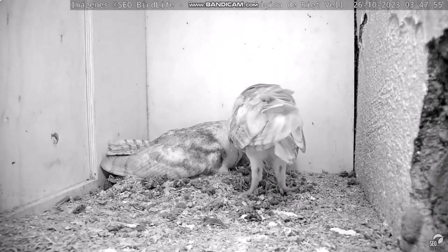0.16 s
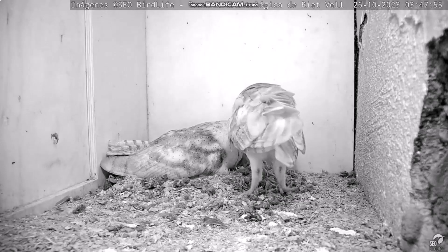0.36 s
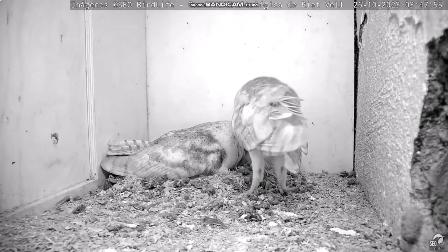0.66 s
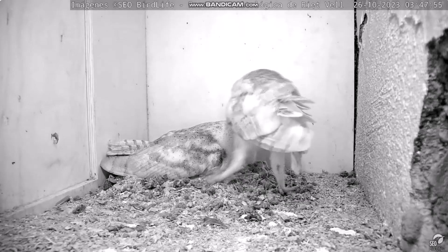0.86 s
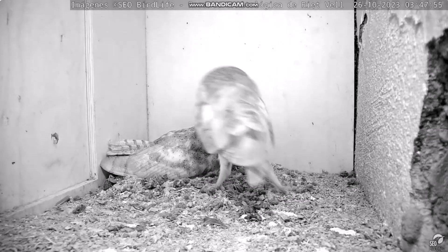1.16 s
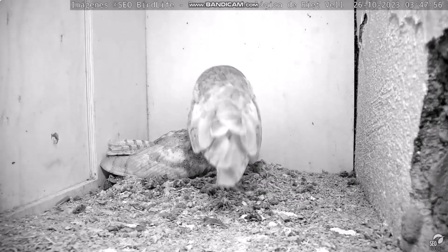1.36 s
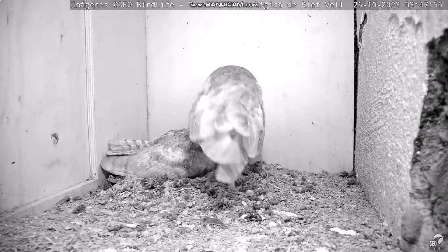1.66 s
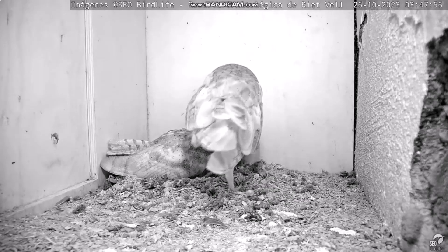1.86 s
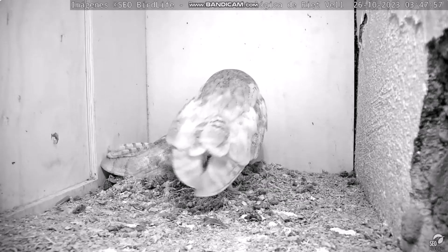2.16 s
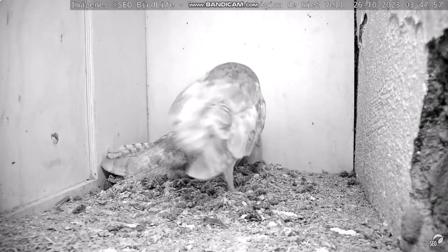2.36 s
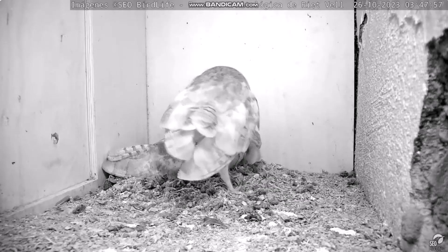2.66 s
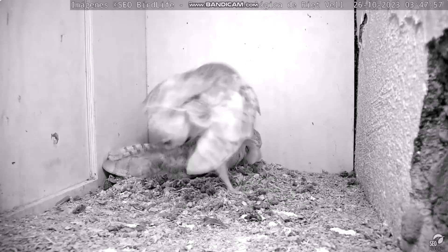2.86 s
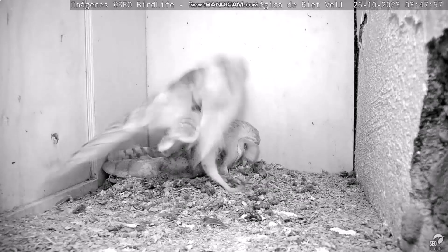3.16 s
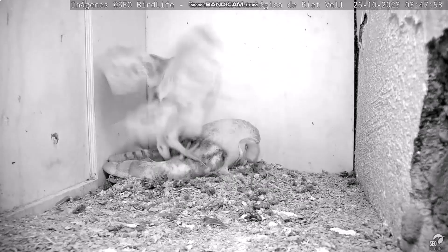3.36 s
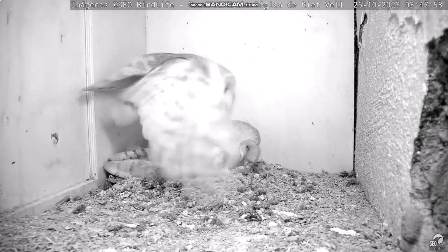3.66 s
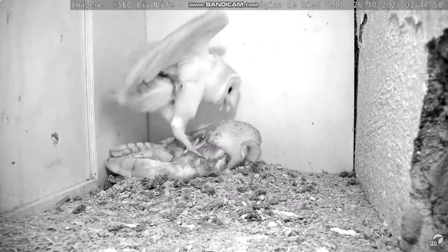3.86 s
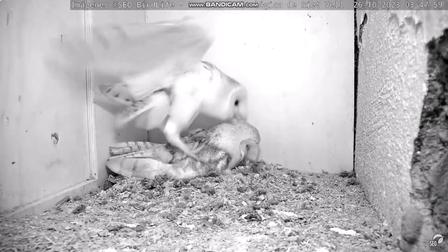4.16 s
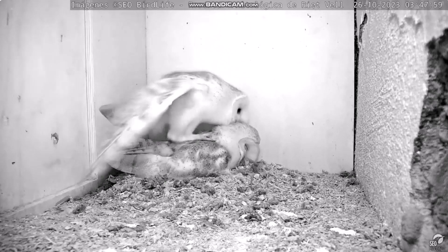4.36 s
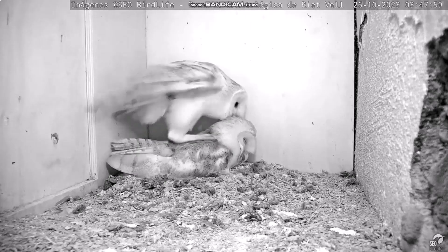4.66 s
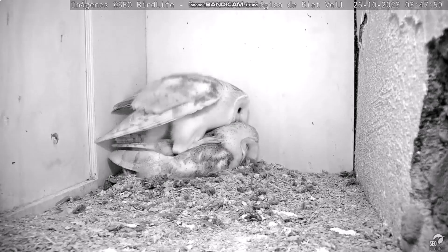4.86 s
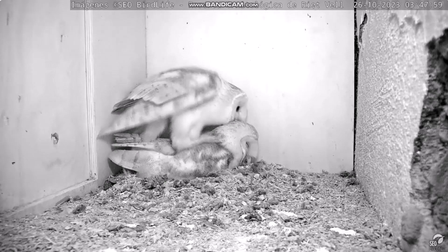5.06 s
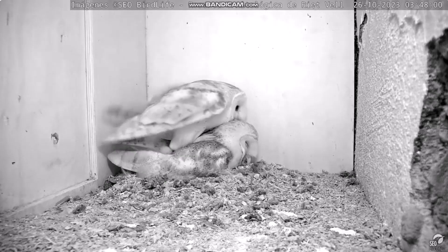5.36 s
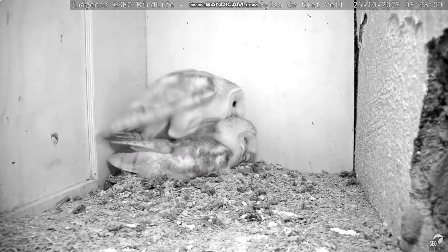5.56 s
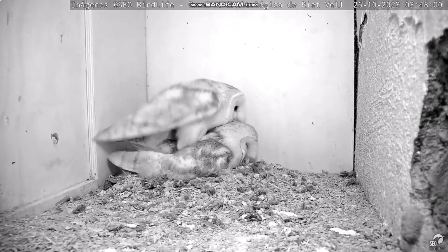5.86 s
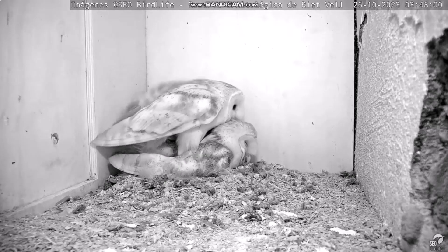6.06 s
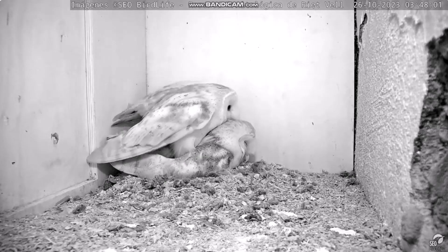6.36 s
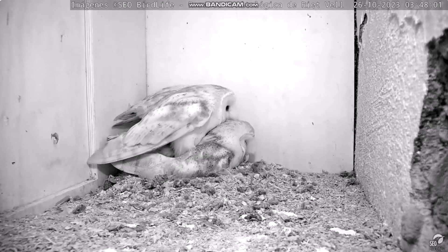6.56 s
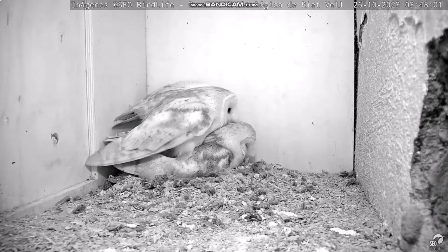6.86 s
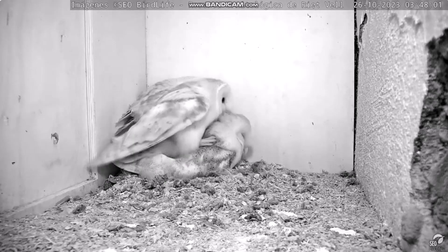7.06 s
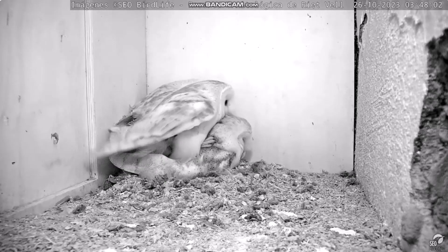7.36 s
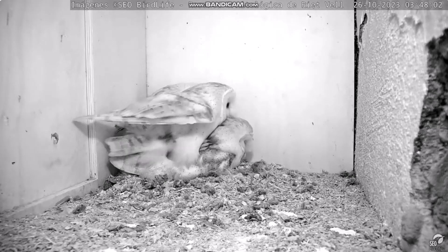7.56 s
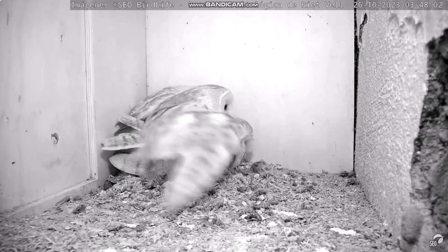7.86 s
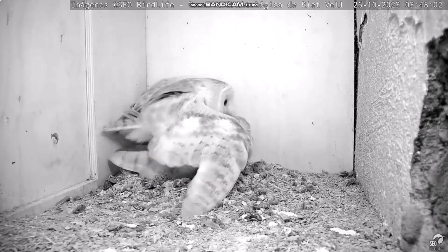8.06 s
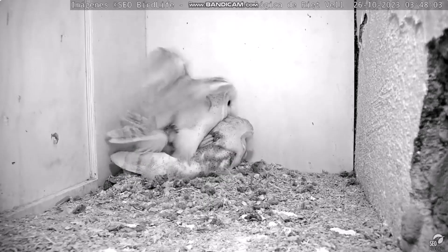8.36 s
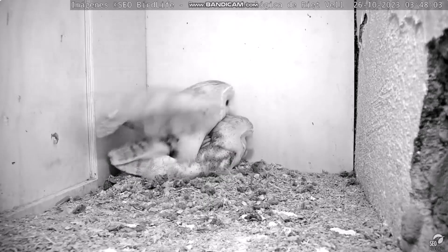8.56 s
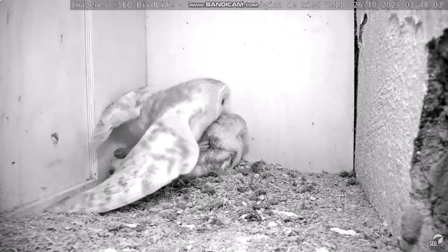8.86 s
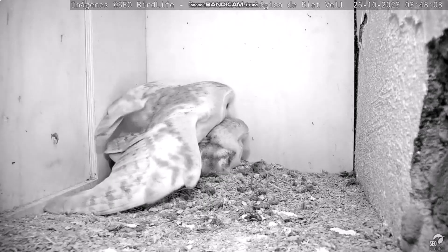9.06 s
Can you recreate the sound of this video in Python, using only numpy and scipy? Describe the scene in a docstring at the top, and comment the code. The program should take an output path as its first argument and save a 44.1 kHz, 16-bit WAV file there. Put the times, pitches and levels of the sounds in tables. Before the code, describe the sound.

A barn owl gives long, trilled, rasping screeches inside a wooden box while a second owl adds short chirps.

```python
"""Two barn owls in a nest box

At night one owl gives long, trilled screeches: its voice swings evenly in a clear whistle, then turns chaotic
and breaks into a rasp. The other answers with short, clear chirps. The wooden box rings with their calls, wing
beats shake a wall, and there is one soft knock. A small camera microphone hears them over its own hiss; there
is one sharp click, and its stream drops out twice."""
import sys
import numpy as np
from scipy import signal
from scipy.fft import rfft, irfft, next_fast_len
from scipy.io import wavfile
from scipy.ndimage import uniform_filter1d

SR = 44100
rng = np.random.default_rng(int(sys.argv[2]) if len(sys.argv) > 2 else 0)


def int16_out(signal):
    """Quantize to a 16-bit WAV file."""
    q = np.round(np.clip(np.atleast_2d(signal).T, -1, 1) * 32767)
    wavfile.write(sys.argv[1], SR, q.astype(np.int16))


N = 405719
TIME = np.arange(N) / SR
PANEL_HZ = 178   # the low note of a wooden wall


def whistle(beats):
    """The voice swings evenly; each trill beat scoops its pitch up and makes its level throb."""
    # start/s, length/s, from/Hz, to/Hz, growth/dB, throb/dB, partials 1 to 4/dB
    notes = [(-.01, 0.13, 1644, 1643, 1.5, 2.5, -34.5, -52, -66, -63.5),
             (0.1, 0.28, 1640, 1653, 1, 5.5, -33, -55.5, -71, -74),
             (0.36, 0.51, 1685, 1701, -5.5, 2.5, -31.5, -62, -69, -68),
             (2.188, 0.079, 1520, 1568, -4, 3, -38.5, -53, -64, -61),
             (2.278, 0.3, 1574, 1570, 1, 7.5, -39.5, -52.5, -64.5, -64.5),
             (4.003, 0.024, 1738, 1776, 4.5, 1, -37, -39, -60, -69),
             (4.283, 0.049, 1981, 1973, 1, 6, -50, -45, -72, -86),
             (4.33, 0.059, 2068, 2138, 10, -2, -53, -49.5, -63, -58),
             (4.39, 0.029, 2014, 1954, 1, -3, -59, -43.5, -60, -53),
             (4.416, 0.0631, 1624, 1700, -6.5, 3.5, -38.5, -37, -62, -62),
             (4.482, .067, 1570, 1620, -2, -2, -41, -46.5, -60, -89.5),
             (5.629, 0.028, 1813, 1823, 0, 6, -35.5, -21.5, -36.5, -59),
             (5.65, 0.0277, 1715, 1614, -18, 4, -34, -28, -66.5, -77),
             (6, 0.05, 1505, 1585, -6.5, 1.5, -36, -34.5, -59, -71),
             (6.053, 0.33, 1599, 1601, 4, 2.5, -43.5, -44.5, -59.5, -80),
             (6.998, 0.051, 1930, 2000, -3, 2.5, -40.5, -53.5, -74, -105),
             (7.36, 1.12, 1543, 1563, -4.5, 6, -49, -70.5, -79, -91.5),
             (8.524, 0.03, 1977, 2040, 1, -3.5, -40.5, -38, -55.5, -92),
             (8.886, 0.047, 1624, 1568, -3, 5.5, -38, -29.5, -51, -78),
             (8.926, 0.09, 1507, 1690, 4.5, 0.5, -45.5, -41, -55, -71)]
    # hoarseness: t/s, pitch waver/Hz, overtone flicker/dB
    hoarseness = [(0, 18, 4.5), (.9, 35, 6), (2.1, 15, 3.5), (2.6, 22, 4.5), (4.2, 55, 5), (4.4, 55, 5),
                  (4.43, 40, 4), (4.5, 20, 3), (5.9, 10, 2), (7.1, 15, 2), (7.36, 75, 2), (8.45, 75, 2),
                  (8.52, 20, 2), (9.2, 20, 2)]
    rise_s, fall_s, sag_hz = .0089, .0177, 40.85
    spans = []
    for start, length, from_hz, to_hz, growth_db, depth_db, *levels_db in notes:
        shares = [0, rise_s / length, 1 - fall_s / length, 1]
        steps_db = [-1.5, 0, growth_db, growth_db - 8]
        glide_hz = [from_hz, from_hz, to_hz, to_hz - sag_hz]
        spans.append(swell(start, length, shares, steps_db, levels_db, glide_hz, [depth_db] * 4))
    gate, (pitch_hz, throb_db, *levels_db) = curves(spans, edge_s=.0066)
    waver_hz, flicker_db = curves([hoarseness])[1]
    scoop = bumps(beats, rise_s=.012, fall_s=.008) - .6
    throb = bumps(beats - .006, rise_s=.014, fall_s=.005) - .7
    levels_db[1:] = [db + flicker_db * (wander(60) + throb) for db in levels_db[1:]]
    pitch_hz = pitch_hz + 85 * scoop + 8.64 * wander(85) + waver_hz * wander(300)
    tone = partials(pitch_hz, levels_db) * (1 + from_db(-26) * wander(500))
    return gate * from_db(throb_db * throb + 1.6 * wander(54)) * tone


def rasp(beats, strength_db, colours):
    """The voice swings chaotically, locking onto a pitch for a moment on each beat, over rushing air."""
    # the voice inside the rasp, one list per screech: t/s, pitch/Hz, partials 1 to 3/dB
    voice = [
        [(.04, 1683, -29, -40.5, -64), (.5, 1725, -31, -41, -56), (.78, 1807, -36, -45, -61),
         (.9, 1933, -27.5, -36.5, -48), (1.2, 2016, -34, -39.5, -56), (1.3, 1999, -32, -37.5, -53),
         (1.4, 2085, -30, -32, -45.5), (1.62, 2016, -32.5, -37.5, -48)],
        [(2.23, 1590, -27, -48.5, -56), (2.55, 1661, -42, -44.5, -56), (2.9, 1768, -43.5, -40.5, -50),
         (3.1, 1880, -33.5, -42.5, -51), (3.22, 1920, -33, -38.5, -44), (3.35, 1770, -31.5, -41.5, -42),
         (3.7, 1739, -41, -41.5, -49), (4.0, 1690, -48, -47, -51)],
        [(4.5, 1630, -30, -31, -46), (4.8, 1707, -40.5, -32.5, -47), (5.2, 1714, -40, -29.5, -46.5),
         (5.64, 1763, -46, -30, -42.5)],
        [(6.02, 1626, -25, -22, -61), (6.25, 1644, -39, -32, -55), (6.6, 1689, -39.5, -28, -45),
         (6.96, 1714, -42, -29.5, -42)],
        [(7.35, 1631, -41.5, -29, -48.5), (7.9, 1644, -45, -27, -45.5), (8.48, 1736, -44.5, -29.5, -48)],
        [(8.89, 1582, -46, -32.5, -57), (9.15, 1673, -33, -23.5, -37)],
    ]
    # beat shape: t/s, climb/Hz, fall/s, overtones between beats/dB, waver/Hz, scatter/Hz, air drive
    beat_shape = [(0, 60, .004, -2, 40, 140, 1.1), (.7, 40, .004, -4, 60, 140, 1.5),
                  (1.0, -170, .0036, -7, 65, 140, 1.6), (1.7, -190, .0034, -7, 65, 140, 1.6),
                  (2.2, 60, .004, 0, 40, 140, 1.1), (2.6, 200, .004, -2, 70, 150, 1.15),
                  (3.3, 240, .004, -4, 90, 150, 1.2), (4.0, 120, .004, -1, 90, 140, 1.2),
                  (4.5, 60, .006, -6, 25, 140, .9), (7.0, 60, .006, -6, 25, 140, .9),
                  (7.3, 50, .0045, -3, 25, 110, .8), (9.2, 60, .0045, -2, 30, 110, .9)]
    gate, (chest_db, throat_db, beak_db) = rasp_levels()
    chest_db = chest_db + 1.85 * wander(8.6)
    break_db = -44.5   # the chaotic voice fades in as the chest level rises past this
    chaos = 1 / (1.5 + np.exp((break_db - chest_db) / 5))
    climb_hz, fall_s, between_db, waver_hz, scatter_hz, drive = curves([beat_shape])[1]
    pitch_hz, *levels_db = curves(voice)[1]
    near = nearest_beat(beats)
    beat_db = strength_db[near]
    scoop = bumps(beats + .005, rise_s=.007, fall_s=.004) - .7
    locked_hz = pitch_hz + 25 * colours[near] + climb_hz * scoop + waver_hz * wander(253)
    locked = partials(locked_hz, [db + beat_db + 3.5 for db in levels_db], rough=(.1, .15, .85))
    locked *= bumps(beats, rise_s=.73 * fall_s, fall_s=fall_s)
    throb = bumps(beats, rise_s=.005, fall_s=.007) - .35
    loose_db = 4.5 * drive ** 2 * throb + 3.8 * wander(170) - 3
    loose_levels_db = [levels_db[0], *np.add(levels_db[1:], between_db)]
    loose = partials(pitch_hz + scatter_hz * wander(351.9), loose_levels_db) * from_db(loose_db)
    pulse = drive * bumps(beats, rise_s=.0035, fall_s=.006)
    air = rushing_air(chest_db, throat_db, beak_db, pulse, beat_db)
    return gate * (chaos * (locked + loose) + air)


def rasp_levels():
    """Long rasps and short cracks of the voice, as a gate and levels for chest, throat and beak."""
    # one list per long rasp: t/s, chest/dB, throat/dB, beak/dB
    rasps = [
        [(.094, -44.5, -39.5, -64), (.14, -53, -45, -69), (.215, -51.5, -48, -69), (.226, -43.5, -36, -59),
         (.27, -53, -44, -61), (.342, -47, -45, -54), (.354, -45, -38.5, -57), (.6, -43, -34.5, -53),
         (.9, -43, -30.5, -49), (1.3, -42.5, -30, -45), (1.64, -41.5, -31.5, -42)],
        [(2.552, -44.5, -42.5, -56), (2.7, -42, -41.5, -50), (3.05, -43.5, -37.5, -48), (3.35, -42, -34, -44.5),
         (3.58, -41.5, -29.5, -35), (3.95, -41, -28.5, -39), (4.04, -48, -43.5, -42)],
        [(4.51, -48, -40, -49), (4.56, -43.5, -35, -43), (4.8, -40.5, -31.5, -37), (5.29, -42, -32.5, -31),
         (5.615, -42.5, -32.5, -38)],
        [(6.154, -64, -57, -60), (6.35, -57.5, -49, -54), (6.368, -43.5, -35, -37), (6.6, -42.5, -34.5, -43.5),
         (6.96, -43.5, -34, -33), (7.005, -46, -42, -40.5)],
        [(7.348, -42, -38, -42), (7.62, -41.5, -36, -38), (8.27, -44, -38.5, -38), (8.37, -38.5, -35.5, -34),
         (8.45, -51.5, -45.5, -40.5), (8.48, -39.5, -36.5, -28.5), (8.515, -48, -38.5, -35)],
        [(8.99, -50, -43, -41), (9.025, -37.5, -34, -43), (9.105, -43.5, -41, -45), (9.2, -37.5, -30.5, -33.5)],
    ]
    # short bursts of rasp: start/s, length/s, chest/dB, throat/dB, beak/dB
    cracks = [(.004, 0.036, -48, -47, -53), (0.05, 0.034, -56, -49, -52), (1.734, .028, -70, -62, -39.5),
              (2.174, 0.085, -52, -59, -72), (2.307, 0.048, -41, -47, -59), (2.422, 0.12, -43, -42, -66),
              (4.248, 0.087, -42, -37, -34), (4.318, 0.055, -70, -44, -29.5),
              (4.371, 0.089, -38, -29, -32.5), (5.963, 0.056, -41.5, -33, -41.5),
              (6.103, 0.062, -59.5, -48, -59), (6.192, .03, -60, -41, -59), (6.227, .03, -62, -45, -58),
              (8.876, 0.12, -40.5, -37.5, -42.5)]
    fade_s, fade_db = .033, (-20.5, -20.5, -21)
    spans = [[*rows, (rows[-1][0] + fade_s, *np.add(rows[-1][1:], fade_db))] for rows in rasps]
    for start, length, *levels_db in cracks:
        spans.append(swell(start, length, [0, .018 / length, 1], [-14, 0, (-25, -26.5, -13)], levels_db))
    return curves(sorted(spans, key=lambda rows: rows[0][0]))


def rushing_air(chest_db, throat_db, beak_db, pulse, beat_db):
    """Noise in chest, throat and beak pulses with the trill, dipping deeper around stronger beats."""
    # tone colour of the air: f/Hz, level/dB
    spectrum = [(120, -65.5), (200, -26), (290, -42.5), (324, -17.5), (372, -13.5), (441, -13.5),
                (682, -17.5), (834, -35), (1730, 1.5), (2290, 6.5), (3070, -23.5), (3370, -14.5),
                (3880, -18), (4600, -15.5), (5460, -11), (7200, -27.5), (8170, -44), (10600, -94),
                (18000, -120)]
    noise, air = coloured(spectrum), np.zeros(N)
    depth_db = np.clip(beat_db + 8, 4, 13)
    # from/Hz, to/Hz, level/dB, share of the pulse depth, flutter/dB
    zones = [(150, 950, chest_db, .13, .88), (850, 3390, throat_db, .23, 1),
             (2570, 4060, beak_db, .86, 2.1), (4020, 12000, beak_db - 13, .55, 1.7)]
    for low_hz, high_hz, level_db, share, flutter_db in zones:
        band = rms_one(filtered(noise, 3, [low_hz, high_hz], "band"))
        air += band * from_db(level_db + share * depth_db * (pulse - 1.55) + flutter_db * wander(24))
    return air + throat_ring() * from_db(throat_db - 4 + .5 * depth_db * (pulse - 1.5))


def throat_ring(width_hz=197):
    """Air rings in the throat, higher as the beak opens, with a faint copy an octave up."""
    # one list per stretch of ringing: t/s, centre/Hz, relative level/dB
    rings = [
        [(0.3, 1750, -9), (0.9, 2094, -16), (1.66, 2052, -4)],
        [(2.55, 1684, 7.5), (3.1, 1898, 8.5), (3.5, 2083, 2.5), (3.85, 2217, -6.5), (4.04, 2210, 3)],
        [(4.252, 2292, 1), (4.3, 2383, 12)],
        [(4.33, 2570, 5), (4.37, 2355, 1), (4.42, 1976, 5)],
        [(4.52, 2206, 0), (5.62, 2342, 3.5)],
        [(6.36, 2298, -0.5), (7.01, 2387, 2)],
        [(7.345, 3052, -1), (8.0, 2989, 5.5), (8.52, 3050, 4)],
        [(8.99, 3030, -6.5), (9.2, 3100, -2)],
    ]
    gate, (centre_hz, level_db) = curves(rings, edge_s=.0074)
    phase = 2 * np.pi * np.cumsum(centre_hz) / SR
    ring = wander(width_hz) * np.cos(phase) + wander(width_hz) * np.sin(phase)
    octave = wander(2 * width_hz) * np.cos(2 * phase) + wander(2 * width_hz) * np.sin(2 * phase)
    return gate * from_db(level_db) * (ring + from_db(-37.5) * octave)


def trill_beats():
    """The trill slows through each run; every beat gets a time, a strength and a chance pitch colour."""
    # runs of beats: first/s, last/s, number of beats
    runs = [(.066, 1.618, 37), (2.265, 3.992, 41), (4.512, 5.289, 19), (5.359, 5.632, 7),
            (6.024, 6.963, 22), (7.354, 8.483, 26), (8.892, 9.153, 7)]
    # marked beats, each replacing the nearest ordinary one: t/s, strength/dB
    accents = [(0.031, -1), (0.099, 2), (0.179, 13), (0.227, -4), (.307, 8), (0.352, 8), (0.514, 1.5),
               (0.555, 5), (0.688, 10), (0.773, 10), (0.817, 9), (.991, 4.5), (1.036, 1), (1.082, -5),
               (1.124, 6.5), (1.166, 6), (1.213, 10.5), (1.257, 5), (1.302, 8), (1.347, -0.5), (1.391, 7.5),
               (1.438, 1), (1.482, 3.5), (1.526, 4), (1.571, 1), (1.618, 2.5), (2.235, -9), (2.305, 7),
               (2.342, 5), (2.385, 0), (2.423, -2), (2.463, 3), (2.503, -8), (2.542, -12), (2.893, -6),
               (3.058, -0.5), (3.098, 2), (3.141, -1), (3.27, 0.5), (3.316, 1), (3.619, 6), (3.842, 11),
               (4.642, -2), (4.682, 3), (4.731, 4.5), (4.814, 11), (4.856, 2), (4.897, 4), (4.983, 3.5),
               (5.071, 6.5), (5.115, 1), (5.157, 1), (5.202, 1.5), (5.358, -1), (5.492, 1.5), (5.539, 7),
               (6.016, -8), (6.11, 7), (6.2, 22.5), (6.285, 28.5), (6.376, -9), (6.465, 4), (6.511, 0.5),
               (6.556, -2), (6.601, -1), (6.642, -1.5), (6.824, 4), (7.355, -12), (7.397, 5), (7.433, 5),
               (7.479, -3), (7.519, 6), (7.569, -2), (7.608, 2.5), (7.653, 2), (7.703, 4.5), (7.794, 6),
               (7.838, -2), (7.882, 5), (7.93, 3), (7.977, 5.5), (8.069, -1), (8.159, -3), (8.204, 6.5),
               (8.297, 11.5), (8.348, -2.5), (8.482, 3.5), (8.927, 4), (9.02, -12), (9.065, 4),
               (9.151, -7.5)]
    # extra half-way beats, where the trill doubles: t/s, strength/dB
    half_beats = [(0.799, -4), (1.189, -2), (1.279, -1), (1.322, 2.5), (1.367, 3), (1.594, -1),
                  (5.044, -2.5), (5.465, 1.5), (6.395, 2.5), (6.444, 2), (7.677, -2), (7.908, -0.5),
                  (8.041, -3), (8.272, -5)]
    beats = np.concatenate([np.linspace(first, last, n) - 8e-5 * np.arange(n) * np.arange(n)[::-1]
                            for first, last, n in runs])
    chance = rng.standard_normal((len(beats), 6))
    beats += .0015 * chance[:, 0]
    strength_db = -2 - 2.5 * chance[:, 1]
    colours = chance[:, -1]
    for at_s, db in accents:
        nearest = np.argmin(np.abs(beats - at_s))
        beats[nearest], strength_db[nearest] = at_s, db
        colours[nearest] *= .4   # marked beats keep close to the voice's pitch
    half_s, half_db = np.transpose(half_beats)
    half_colours = .37 * rng.standard_normal((len(half_s), 4))[:, -1]
    slots = np.searchsorted(beats, half_s)
    return (np.insert(beats, slots, half_s), np.insert(strength_db, slots, half_db),
            np.insert(colours, slots, half_colours))


def chirps():
    """The second owl's short calls; leaking air spreads a slight haze around each partial."""
    # start/s, length/s, from/Hz, held/Hz, to/Hz, held from/share, held until/share,
    # dulling/dB, partials 1 to 3/dB
    calls = [(1.662, .018, 1399, 1384, 1360, .4, .6, 6, -68, -62, -75),
             (1.698, .022, 1350, 1328, 1313, .4, 0.66, 7, -71, -55, -75),
             (1.723, 0.028, 1720, 1678, 1744, 0.44, 0.47, 11, -48.5, -42.5, -51),
             (1.774, 0.041, 1920, 1640, 1480, 0.53, 0.77, 8, -50.5, -60, -79),
             (3.69, 0.076, 1247, 1398, 1421, 0.3, 0.85, 17, -46, -47, -41),
             (3.819, 0.069, 1487, 1535, 1442, 0.33, 0.57, 9, -44, -52, -44),
             (4.416, 0.038, 1742, 1430, 1319, 0.406, 0.38, 16, -41.5, -42, -30.5),
             (4.599, 0.069, 1290, 1447, 1396, 0.43, 0.52, 11, -39, -56, -36),
             (4.826, 0.06, 1300, 1402, 1260, 0.32, 0.51, -2, -37.5, -60, -45),
             (5.143, 0.061, 1189, 1399, 1313, .4, 0.42, 6, -39, -45.5, -45),
             (6.277, 0.05, 1224, 1303, 1412, 0.35, 0.4, 8, -47.5, -53.5, -69),
             (7.068, 0.025, 1183, 1204, 1201, 0.32, 0.67, -2, -55.5, -71, -79),
             (7.143, 0.023, 1444, 1474, 1583, 0.36, 0.46, -6, -56, -72, -67),
             (7.274, 0.024, 1304, 1293, 1270, 0.3, 0.63, 3, -55, -61, -78)]
    # three loud calls with kinks in the pitch: t/s, pitch/Hz, partials 1 to 3/dB
    squeals = [
        [(3.972, 1200, -52, -59, -44), (3.984, 1264, -55, -51, -44), (3.994, 1390, -42, -44, -32),
         (4.006, 1360, -46, -47, -38), (4.024, 1374, -38, -51, -37), (4.05, 1405, -44, -51, -36),
         (4.062, 1317, -48, -54, -50), (4.074, 1304, -57, -55, -57), (4.083, 1390, -45.5, -54, -45),
         (4.094, 1376, -42, -54, -36), (4.108, 1293, -50, -43, -35), (4.118, 1243, -44, -47, -51),
         (4.132, 1230, -40.5, -45, -42), (4.146, 1270, -39, -43, -38), (4.156, 1210, -47, -45, -57)],
        [(5.713, 1293, -56, -79, -75), (5.722, 1297, -38.5, -63, -76), (5.73, 1457, -43, -42, -43),
         (5.738, 1491, -37, -43, -33), (5.752, 1526, -37, -44, -38), (5.766, 1483, -43, -41, -35),
         (5.773, 1473, -45, -48, -43), (5.782, 1364, -37, -51, -52), (5.792, 1350, -60, -64, -71)],
        [(7.165, 1640, -49, -56, -56), (7.176, 1730, -38.5, -37, -34), (7.19, 1818, -41, -27, -36),
         (7.202, 1756, -34, -29.5, -30), (7.212, 1670, -39, -35, -24), (7.222, 1610, -31, -40, -28.5),
         (7.232, 1596, -49, -48, -36), (7.244, 1553, -42, -43, -44), (7.256, 1487, -40, -57, -46),
         (7.27, 1426, -54, -54, -74)],
    ]
    spans = [chirp(*row) for row in calls] + squeals
    gate, (pitch_hz, *levels_db) = curves(sorted(spans, key=lambda rows: rows[0][0]))
    levels_db += [levels_db[2] + db for db in (-16.5, -24, -31)]   # partials 4 to 6
    clear = partials(pitch_hz + 18 * wander(170), levels_db) * from_db(1.3 * wander(130))
    breath = from_db(-16) * wander(400) * clear
    return gate * (clear + breath)


def chirp(start, length, from_hz, held_hz, to_hz, held_from, held_until, dulling_db, *levels_db):
    """One call slides to its held pitch while it swells, holds, then bends off and fades."""
    fade_from = .91
    # upper partials come later and leave earlier
    rise_db_per_s, fall_db_per_s = (446.5, 757, 799.5), (701, 1001.5, 1093)
    shares = np.sort([0, held_from, held_until, fade_from, 1])
    pitch_hz = np.interp(shares, [0, held_from, held_until, 1], [from_hz, held_hz, held_hz, to_hz])
    rise_s, fall_s = held_from * length, (1 - fade_from) * length
    steps_db = []
    for rise, fall, dull in zip(rise_db_per_s, fall_db_per_s, [0, dulling_db, dulling_db]):
        corners_db = [-rise * rise_s, 0, -dull, -dull - fall * fall_s]
        steps_db.append(np.interp(shares, [0, held_from, fade_from, 1], corners_db))
    return swell(start, length, shares, np.transpose(steps_db), levels_db, pitch_hz)


def wall_echoes(sound, echo_db, fade_s):
    """Close walls add a blur of echoes that falls by 60 dB in fade_s."""
    age = np.arange(SR // 5) / SR
    tail = rng.standard_normal(len(age)) * from_db(-60 * age / fade_s) * (age > .002)
    return sound + from_db(echo_db) * signal.fftconvolve(sound, tail / np.linalg.norm(tail))[:N]


def box_ring(sound, gain_db):
    """The air in the box has notes of its own; each lifts a narrow band and rings on briefly."""
    # notes of the air: f/Hz, width/Hz, lift/dB
    modes = [(371.7, 34.3, 11), (979, 15, 8.5), (1135, 58, 10.5), (1512.7, 57, 12), (1779, 48, 9),
             (1979, 53, 7), (2204, 23, 9.5), (2395, 41, 9), (2622, 129, 11), (2808, 40, 11), (2998, 61, 11),
             (3240, 68, 10), (3460, 33, 8), (3683, 150, 4.5), (4200, 170, 3.5), (4496, 97, 8),
             (4700, 13, 4.5), (5400, 69, 5.5), (5850, 34, 6)]

    def response(f):
        lifts = [1 + (from_db(db) - 1) / (1 + 1j * (f - hz * hz / f) / width) for hz, width, db in modes]
        return from_db(gain_db) * np.prod(lifts, axis=0)
    return shaped(sound, response)


def click_and_knock():
    """A sharp click of noise; later a soft knock, and the wall booms."""
    # bursts of noise: t/s, level/dB, from/Hz, to/Hz, fade time/s
    bursts = [(3.46, -31, 1200, 5600, .06), (8.81, -46, 250, 900, .03)]
    puffs = np.zeros(N)
    for at_s, level_db, low_hz, high_hz, fade_s in bursts:
        puff = rms_one(filtered(rng.standard_normal(N), 2, [low_hz, high_hz], "band"))
        slope_s = np.where(TIME < at_s, fade_s / 2, fade_s)
        puffs += puff * from_db(level_db - 60 * np.abs(TIME - at_s) / slope_s)
    boom_s, boom_fade_s = 8.812, .22
    age = np.maximum(TIME - boom_s, 0)
    boom_level = (1 - np.exp(-age / .02)) * from_db(-36 - 60 * age / boom_fade_s)
    return puffs + boom_level * np.sin(2 * np.pi * PANEL_HZ * age)


def wings():
    """Gusts from the wings make a wall hum at its low note."""
    # one list per spell of flapping: t/s, level/dB
    gusts = [
        [(3.1, -71.5), (3.642, -61.5), (4.062, -65), (4.1, -73)],
        [(7.3, -78), (7.448, -67.5), (8.378, -74), (8.508, -90), (8.6, -68)],
    ]
    gate, (level_db,) = curves(gusts, edge_s=.05)
    hum = shaped(rng.standard_normal(N), lambda f: 1 / (1 + ((f - PANEL_HZ) / 13) ** 2))
    return gate * from_db(level_db) * rms_one(hum)


def microphone_hiss():
    """The microphone's own steady noise."""
    # tone colour of the hiss: f/Hz, level/dB
    spectrum = [(18, -90), (30, -64.5), (114, -50.5), (134, -35), (148, -8.5), (242, -10.5), (299, -9),
                (396, -11), (801, -28.5), (1010, -21.5), (1280, -16.5), (2100, -20), (3120, -13),
                (5750, -24), (6930, -31), (8170, -28), (10600, -87.5), (18000, -120)]
    return from_db(-55.5) * coloured(spectrum)


def partials(pitch_hz, levels_db, rough=()):
    """Sine waves at 1, 2, 3... times the pitch; a rough one trades some of its tone for noise."""
    phase = 2 * np.pi * np.cumsum(pitch_hz) / SR
    haze = wander(450) if rough else 0
    swing = [np.sqrt(1 - r * r) + r * haze for r in rough] or [1] * len(levels_db)
    waves = (from_db(db) * swing[k] * np.sin((k + 1) * phase) for k, db in enumerate(levels_db))
    return np.sqrt(2) * sum(waves)


def nearest_beat(beats):
    """Which beat is closest at each moment."""
    return np.searchsorted((beats[1:] + beats[:-1]) / 2, TIME)


def bumps(beats, rise_s, fall_s):
    """A smooth bump of height 1 at every beat."""
    late_s = TIME - beats[nearest_beat(beats)]
    return np.exp(-.5 * (late_s / np.where(late_s < 0, rise_s, fall_s)) ** 2)


def swell(start, length, shares, steps_db, levels_db, *controls):
    """One note as rows: at each share of its length, the time, the controls and the stepped levels."""
    return [(start + length * share, *values, *np.add(levels_db, db))
            for share, db, *values in zip(shares, steps_db, *controls)]


def curves(spans, edge_s=.004):
    """Turn lists of timed rows into a gate, open during each list, and one smooth curve per column."""
    times, *columns = np.concatenate(spans).T
    gate = np.zeros(N)
    for rows in spans:
        corners = np.repeat([rows[0][0], rows[-1][0]], 2) + edge_s / 2 * np.array([-1, 1, -1, 1])
        gate += np.interp(TIME, corners, [0, 1, 1, 0])
    smooth = [uniform_filter1d(np.interp(TIME, times, column), size=150) for column in columns]
    return np.minimum(gate, 1), smooth


def wander(rate_hz):
    """A random wobble of typical size 1, mostly slower than rate_hz."""
    return rms_one(filtered(rng.standard_normal(N), 2, rate_hz))


def coloured(spectrum):
    """Noise of strength 1, shaped by rows of f/Hz, level/dB."""
    hz, db = np.transpose(spectrum)
    noise = rng.standard_normal(N)
    return rms_one(shaped(noise, lambda f: from_db(np.interp(np.log(f), np.log(hz), db))))


def shaped(sound, gain_at):
    """Turn each frequency up or down by gain_at(f)."""
    size = next_fast_len(N + SR)
    return irfft(rfft(sound, size) * gain_at(np.fft.rfftfreq(size, 1 / SR) + 1), size)[:N]


def filtered(sound, order, hz, keep="low"):
    """Keep the lows, the highs or a band; a higher order cuts more steeply."""
    return signal.sosfilt(signal.butter(order, hz, keep, fs=SR, output="sos"), sound)


def from_db(db):
    """Decibels as a plain multiplier."""
    return 10 ** (np.asarray(db) / 20)


def rms_one(sound):
    """Scale to an average strength (rms) of 1."""
    return sound / np.sqrt(np.mean(sound ** 2) + 1e-20)


def scene():
    """Both owls in the box, with a knock and their wings, over the hiss; and one sharp click."""
    beats, strength_db, colours = trill_beats()
    screech = whistle(beats) + rasp(beats, strength_db, colours)
    owls = wall_echoes(screech + chirps(), echo_db=-12, fade_s=.07)
    return (box_ring(owls, gain_db=-2.5) + click_and_knock() + wings() + microphone_hiss())[None]


def record(dry):
    """The camera rounds off peaks, cuts treble and bass, and drops out twice with clicks."""
    # gaps in the stream: from/s, to/s, what is left/dB, click at each edge/dB
    dropouts = [(5.2862, 5.3297, -30, -31), (6.2895, 6.2966, -23, -44)]
    out = filtered(.4 * np.tanh(dry / .4), 6, 7900)
    out = signal.sosfilt(signal.cheby2(10, 50, 8964, fs=SR, output="sos"), out)   # steep treble cut
    for start, end, left_db, click_db in dropouts:
        out *= np.where((TIME > start) & (TIME < end), from_db(left_db), 1)
        out[:, [int(start * SR), int(end * SR)]] += from_db(click_db)
    out = filtered(out, 6, 117, "high")
    out += from_db(-70.5) * filtered(rng.standard_normal(N), 1, 120)   # faint rumble of the electronics
    return signal.sosfilt(signal.cheby2(12, 70, 15700, fs=SR, output="sos"), out)   # cut the very top


dry = scene()
out = record(dry)
int16_out(out)
```